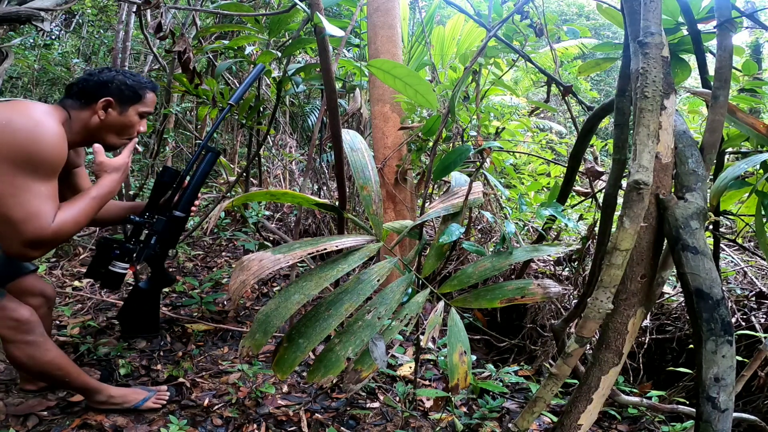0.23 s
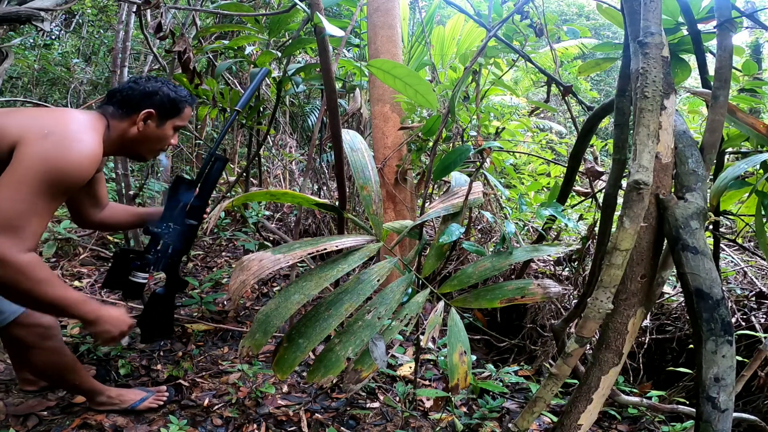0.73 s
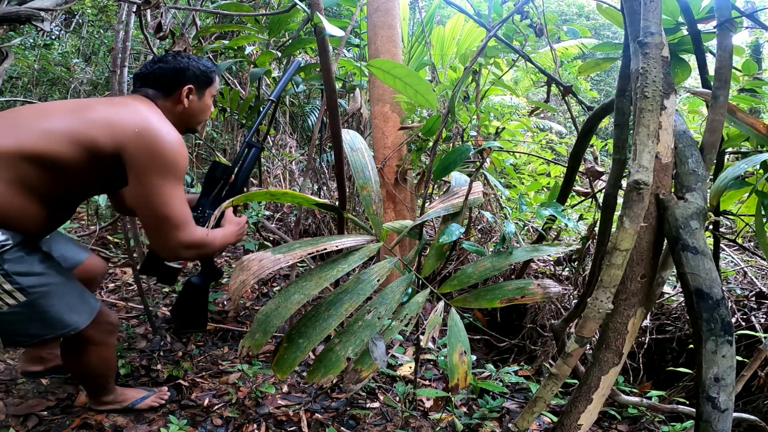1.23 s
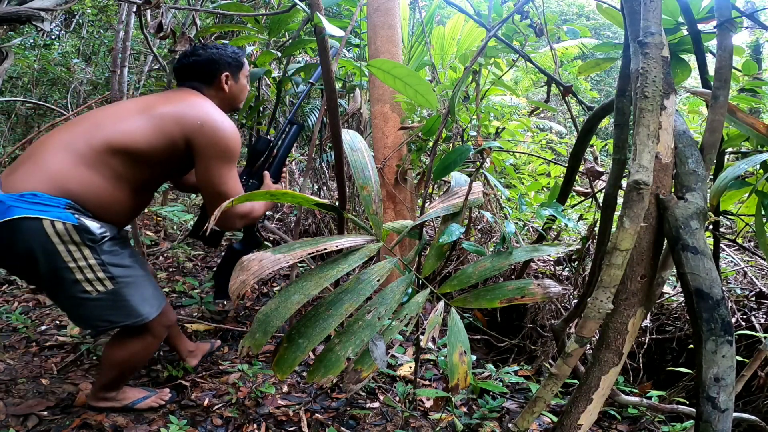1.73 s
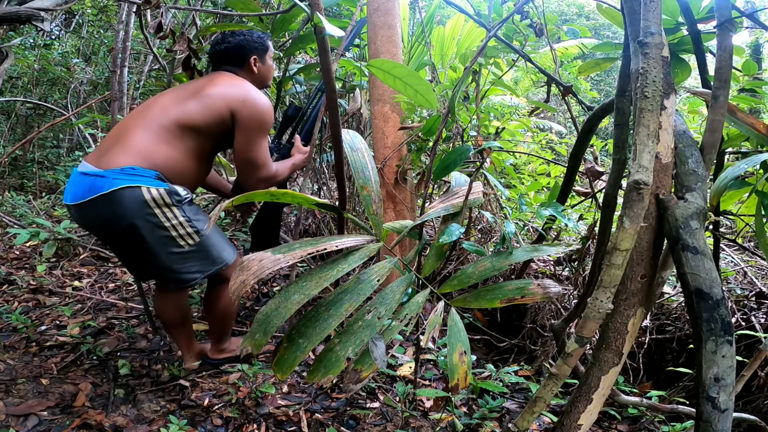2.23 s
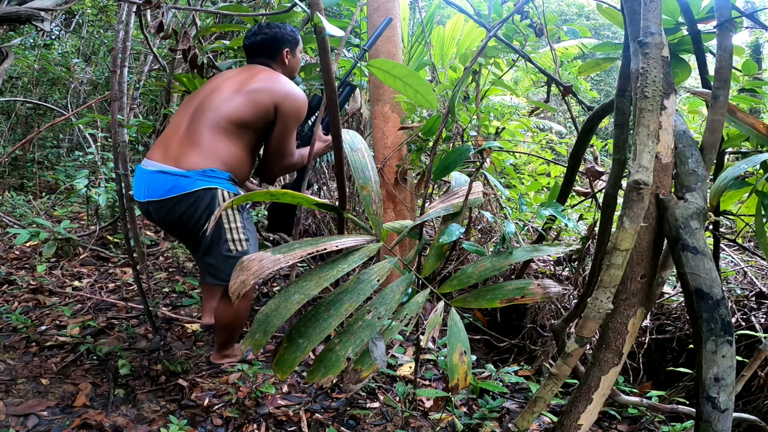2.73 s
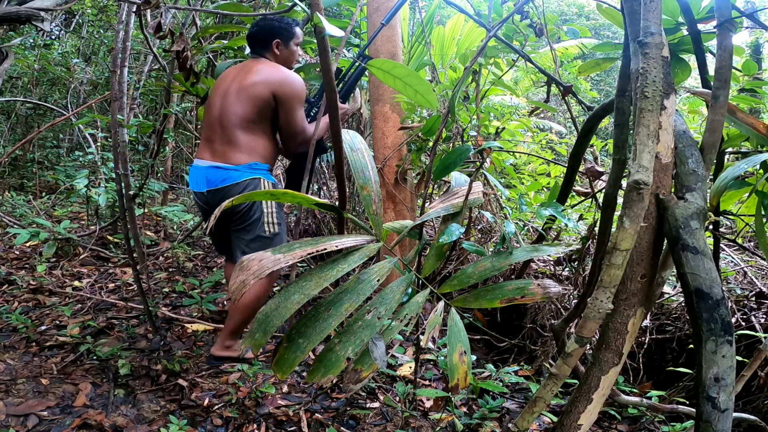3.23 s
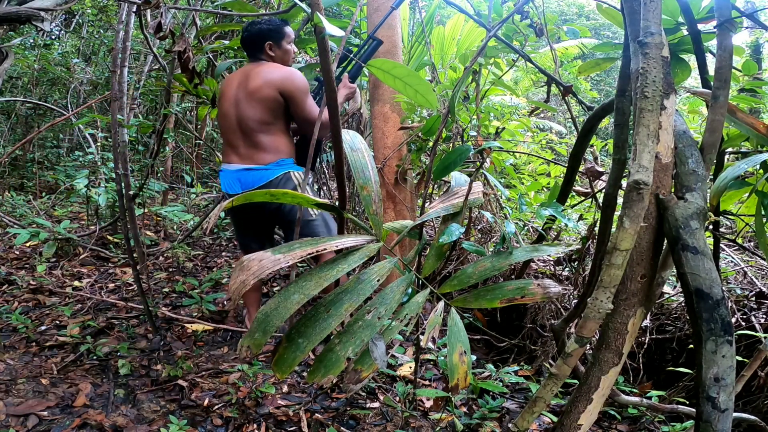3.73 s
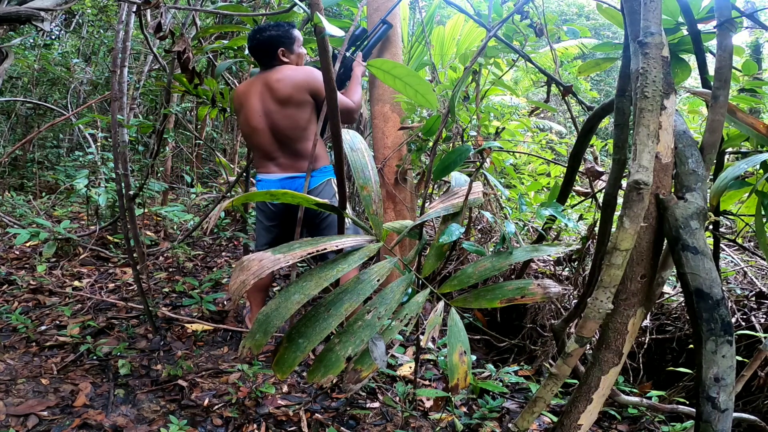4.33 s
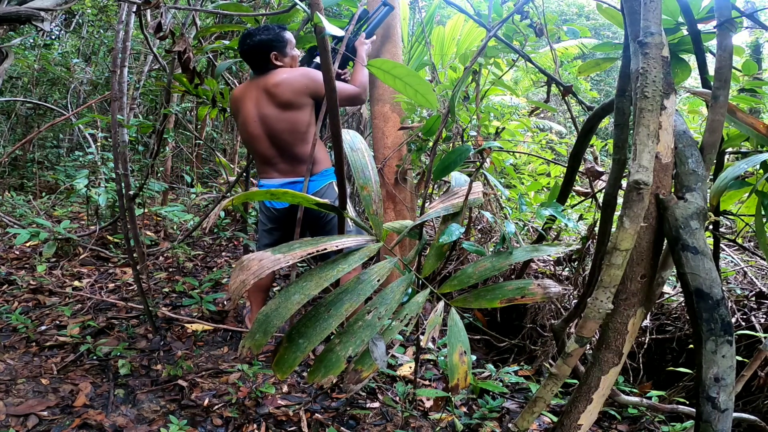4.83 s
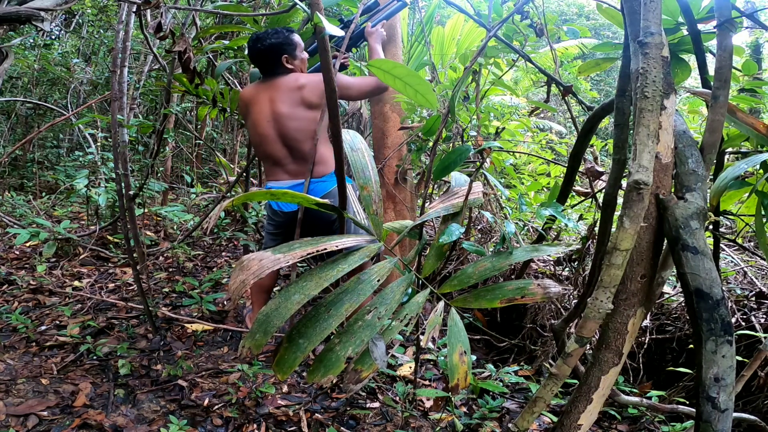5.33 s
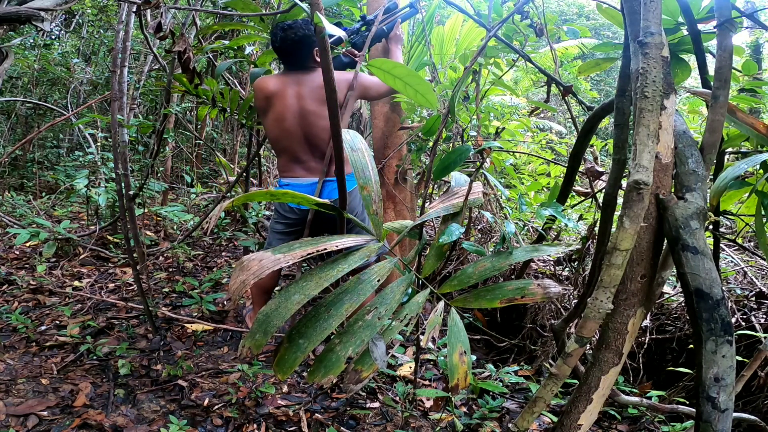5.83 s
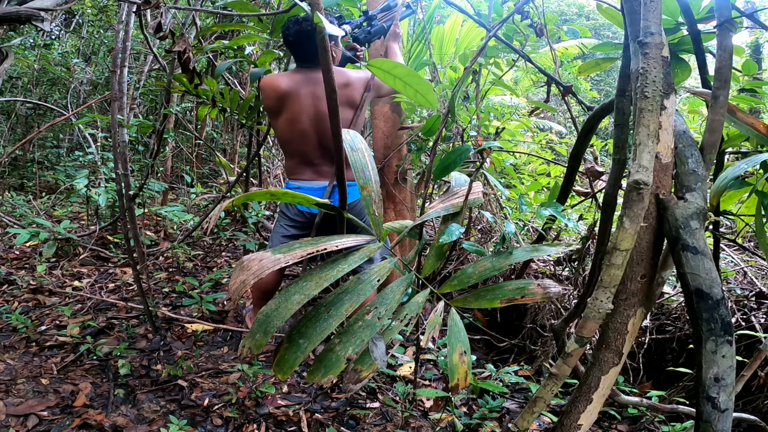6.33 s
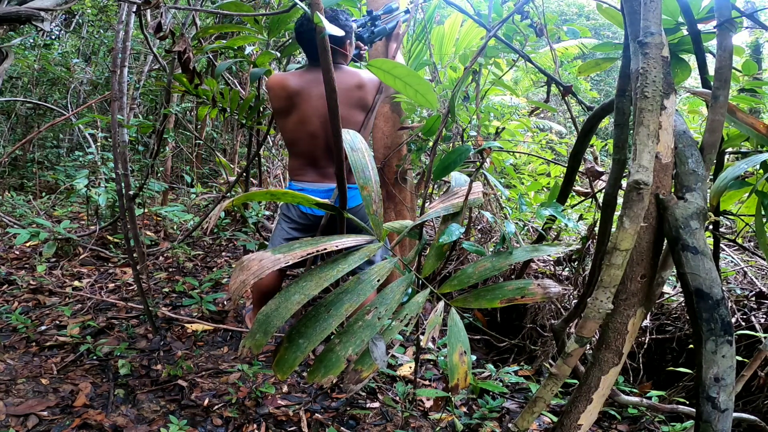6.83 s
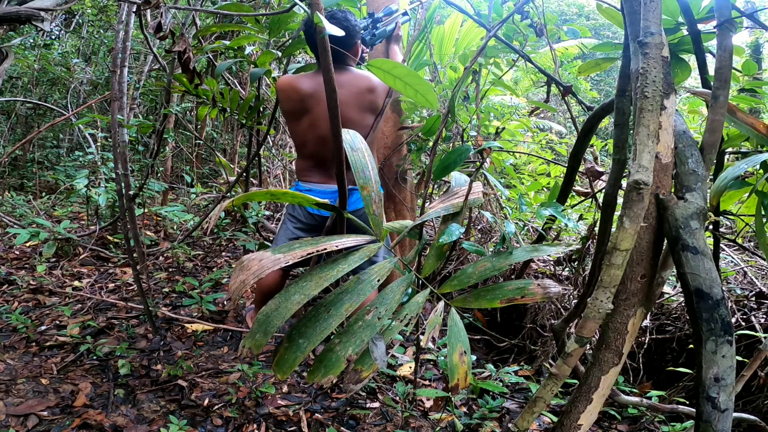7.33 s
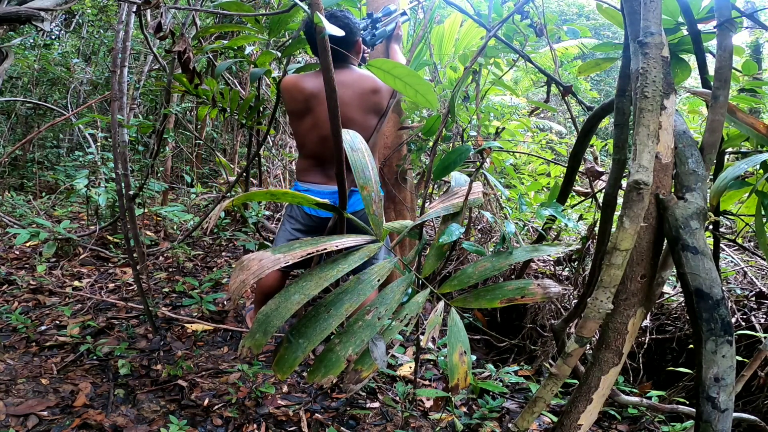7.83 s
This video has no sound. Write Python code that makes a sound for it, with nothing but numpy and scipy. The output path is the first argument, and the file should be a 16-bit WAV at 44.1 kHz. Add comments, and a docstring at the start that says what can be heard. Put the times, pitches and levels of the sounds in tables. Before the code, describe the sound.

Outdoor stereo forest scene with echoes among trunks. A dense buzzing cicada song around three kilohertz pulses about every one and a quarter seconds. Faint cricket tone, thin high insect whine and low breeze sit behind it. Nearby, stealthy footsteps press damp and dry leaves, stalks tick, and sticks crack, hardest just before four seconds. Regular bird whistles with chirps continue to the end as the footsteps grow sparse.

```python
"""Creeping through a tropical forest

Cicadas (tymbal-modulated partials) sing slow falling phrases over a far chorus, hiss and breeze (shaped noise).
Birds whistle, chirp and hoot, a cricket holds a high tone and an insect whines (gliding sines).
A man creeps over leaf litter: leaves crunch (random snaps), sticks crack and hollow wood knocks (ringing modes),
and dry stalks tick as he brushes past (filtered clicks). Decaying noise echoes place sounds among the trees.
"""
import sys
import numpy as np
from scipy import signal
from scipy.fft import rfft, irfft
from scipy.io import wavfile

SR = 44100
rng = np.random.default_rng(int(sys.argv[2]) if len(sys.argv) > 2 else 0)


def waveform_to_disk(signal):
    """Save audio, clipped to [-1, 1], as 16-bit WAV at the path in sys.argv[1]."""
    frames = np.transpose(np.atleast_2d(signal))
    scaled = np.clip(frames, -1, 1) * 32767
    samples = np.round(scaled).astype(np.int16)
    wavfile.write(sys.argv[1], SR, samples)


N = 357210
TIME = np.arange(N) / SR
FREQS = np.maximum(np.arange(N // 2 + 1) * SR / N, 1)


def from_db(db):
    """Decibels to amplitude gain."""
    return 10 ** (np.asarray(db) / 20)


def rms_one(x):
    """Scale to unit rms."""
    return x / np.sqrt(np.mean(x ** 2) + 1e-20)


def in_time(rows, t):
    """Interpolate each column of a curve at times t."""
    s, *columns = np.transpose(rows)
    return [np.interp(t, s, c) for c in columns]


def at_hz(points):
    """Interpolate a spectrum over log frequency."""
    hz, value = np.transpose(points)
    return np.interp(np.log(FREQS), np.log(hz), value)


def drift(rate_hz, size=N):
    """Unit-rms lowpassed noise, computed at SR / 40 and interpolated."""
    knots = rng.standard_normal(size // 40 + 2002)
    pole = np.exp(-80 * np.pi * rate_hz / SR)
    # the first 2000 knots let the filter settle
    slow = signal.lfilter([1], [1, -2 * pole, pole ** 2], knots)[2000:]
    return np.interp(np.arange(size) / 40, np.arange(len(slow)), rms_one(slow))


def add(track, start_s, sound):
    """Mix a sound in at start_s, trimmed to the track."""
    at = int(round(start_s * SR))
    lo, hi = max(at, 0), min(at + sound.shape[-1], N)
    track[..., lo:hi] += sound[..., lo - at:hi - at]


def pan(left_db):
    """Channel gains for a left-over-right level difference."""
    return from_db(np.array([[.5], [-.5]]) * left_db)


def band(x, low_hz, high_hz, order):
    """Causal Butterworth band-pass."""
    edges_hz = [low_hz, min(high_hz, SR / 2 - 1)]
    return signal.sosfilt(signal.butter(order, edges_hz, "band", fs=SR, output="sos"), x)


def at_level(sound, db):
    """Scale a blow so that its first 15 ms have the given rms level."""
    onset = sound[:SR * 15 // 1000]
    return from_db(db) * sound / np.sqrt(np.mean(onset ** 2))


def ring(x, hz, t60_s):
    """Damped two-pole resonator: a unit click starts a sine of height 1."""
    r, w = from_db(-60 / (t60_s * SR)), 2 * np.pi * hz / SR
    return signal.lfilter([0, np.sin(w)], [1, -2 * r * np.cos(w), r * r], x)


# stereo coherence of diffuse noise: (frequency [Hz], left-right likeness [0-1])
STEREO_LIKENESS = [(50, 0.98), (95, 0.86), (150, 0.1), (400, 0.23), (1200, 0.55), (3000, 0.27),
                   (5500, 0.048), (6600, 0.72), (7500, 1), (10500, .98), (13000, 1)]


def coloured(pair, gain):
    """Turn two unrelated signals into a diffuse stereo field with the given spectral gain."""
    mid, side = rfft(pair) * gain
    alike = at_hz(STEREO_LIKENESS)
    mid = np.sqrt((1 + alike) / 2) * mid
    side = np.sqrt((1 - alike) / 2) * side
    return irfft(mid + side * [[1], [-1]], N)


def noise(gain):
    """Diffuse noise with the given amplitude per root Hz."""
    return coloured(rng.standard_normal((2, N)), gain * np.sqrt(SR / 2))


def forest(x, wet_db, likeness):
    """Trunks and leaves scatter a sound into an exponentially dying cloud of echoes."""
    t60_s = 0.96
    t = TIME[:SR]
    mid, side = rng.standard_normal((2, SR)) * from_db(-60 * t / t60_s)
    echoes = np.sqrt(1 + likeness) * mid + np.sqrt(1 - likeness) * side * [[1], [-1]]
    response = rms_one(echoes) / np.sqrt(SR)
    wet = signal.fftconvolve(np.atleast_2d(x), response, axes=1)[:, :N]
    return (x + from_db(wet_db) * wet) / np.sqrt(1 + from_db(wet_db) ** 2)


def calls(table, shape, waver_hz, flutter_db):
    """A nearly pure tone follows the same pitch glide and level shape on every call."""
    t, out = TIME[:int(shape[-1][0] * SR)], np.zeros(N)
    bend_hz, shape_db = in_time(shape, t)
    for start_s, db, base_hz in table:
        hz = base_hz + bend_hz + waver_hz * drift(59, len(t))
        phase = 2 * np.pi * np.cumsum(hz) / SR
        level_db = db + shape_db + flutter_db * drift(76, len(t))
        swell = from_db(level_db) * signal.windows.tukey(len(t), .1)
        add(out, start_s, np.sqrt(2) * swell * np.sin(phase))
    return out


# breeze, before trim and lumps: (time [s], level [dB])
BREEZE_LEVEL = [(0.0, -69.5), (0.54, -71.5), (1.49, -58.5), (2.75, -68), (2.77, -82), (2.84, -50),
                (2.98, -86), (3.02, -65.5), (5.37, -73), (6.43, -60), (6.45, -74), (6.68, -49.5),
                (6.75, -77), (6.88, -54.5), (7.2, -65.5), (7.49, -58), (7.76, -81), (8.1, -61)]
# breeze spectrum, normalised to unit rms in use: (frequency [Hz], relative level [dB])
BREEZE_SPECTRUM = [(20, -25), (45, -2), (65, 5.5), (95, -3), (150, -6), (400, -50)]
# still air, before trim and pan: (frequency [Hz], level [dB per Hz])
AIR_SPECTRUM = [(25, -90.5), (55, -103), (110, -92.5), (155, -74), (220, -84.5), (300, -93.5), (750, -106),
                (1200, -101.5), (1550, -103), (2250, -106.5), (4300, -106), (8000, -104), (10200, -116),
                (12800, -117), (14000, -140)]


def air(breeze_db=0.5, lumps_db=2.5, drone_db=0.5):
    """Steady noise gives a low far drone and soft hiss; level-swept low noise is the buffeting breeze."""
    gust_db, = in_time(BREEZE_LEVEL, TIME)
    level_db = gust_db + breeze_db + lumps_db * drift(15)
    breeze = from_db(level_db) * rms_one(noise(from_db(at_hz(BREEZE_SPECTRUM))))
    still = noise(from_db(at_hz(AIR_SPECTRUM) + drone_db)) * pan(-3.2)
    return breeze + still


# far chorus humps, before throb and pan: (centre [Hz], width [Hz], level [dB per Hz])
CHORUS_HUMPS = [(2958, 129, -75.5), (3082, 234, -77), (5780, 420, -90.5), (6290, 235, -90),
                (11670, 540, -102), (12070, 390, -100), (12260, 300, -104)]


def far_chorus(throb_db=1.5, left_db=4.0):
    """Countless far cicadas merge into humps of noise round their partials."""
    power = np.zeros(len(FREQS))
    for hz, width_hz, db in CHORUS_HUMPS:
        offset = (FREQS - hz) / width_hz
        power += from_db(db) ** 2 / (1 + 2 * offset ** 2) ** 2
    return noise(np.sqrt(power)) * from_db(throb_db * drift(12)) * pan(left_db)


def phrase_starts():
    """Start times of the cicada phrases, repeated at a steady pace."""
    first_s, every_s = -.5, 1.257
    return np.arange(first_s, N / SR, every_s)


# one phrase, before each singer's stretch and offsets: (time [s], pitch [Hz], level [dB])
CICADA_PHRASE = [(0, 3055, -9), (.12, 3034, -2), (.42, 2999, 0), (.62, 2982, 0), (.72, 2975, -10)]
# singers: (pitch offset [Hz], lateness [s], length [x phrase], level [dB], brightness [dB per overtone],
# left over right [dB], left carrier lag [ms])
CICADA_SINGERS = [(0, 0, 1, -1, 1, -1, 0.0041), (-22, .0, .95, -2.5, 1.5, 0.5, 0.09),
                  (14, -.03, 1, -10.5, 1.5, 9, 0.072), (-120, .42, 1.35, -4, 0.5, 2, 0.0044),
                  (-100, .55, 1.2, -2.5, -1.5, 1, 0.11), (-165, 1, 1.05, -18, 3, -8, 0.091)]
# abdomen partials, before singer brightness: (multiple of pitch, level [dB])
PARTIALS = [(1, -54), (2, -60), (3, -79.5), (4, -68)]
# low-partial loudness; only the swing about its mean is used: (time [s], level [dB])
CICADA_SWING = [(0.0, -52), (0.63, -53), (1.17, -50.5), (1.44, -53), (2.48, -49), (2.77, -52.5),
                (3.83, -50.5), (3.95, -54.5), (4.17, -52), (4.92, -50.5), (5.37, -51), (6.14, -50),
                (6.63, -50), (7.53, -51), (7.74, -49), (8.1, -53)]
# pitches favoured by echoes off the trunks: (frequency [Hz], gain [dB])
TRUNK_GAIN = [(2820, -5), (2870, -1), (2900, -1), (2923, 4), (2957, -5), (2993, 4), (3014, -2), (3032, 1.5),
              (3065, -3), (3200, 0)]


def cicadas(waver_hz=2.896, flutter_db=2.5, tymbal_hz=136.1):
    """Tymbals drive tuned abdomens; pitch sags through each phrase and lower singers answer higher ones."""
    rasp_hz, throb = 7.0, .32
    low, high = np.zeros((2, 2, N))
    for offset_hz, late_s, stretch, singer_db, bright_db, left_db, lag_ms in CICADA_SINGERS:
        t = TIME[:int(CICADA_PHRASE[-1][0] * stretch * SR)]
        pitch_hz, level_db = in_time(CICADA_PHRASE, t / stretch)
        fade = signal.windows.tukey(len(t), .1)
        for start_s in phrase_starts():
            hz = pitch_hz + offset_hz + waver_hz * drift(6.2, len(t)) + rasp_hz * drift(184.0, len(t))
            lag_s = np.array([[lag_ms], [0]]) / 1000
            phase = 2 * np.pi * (np.cumsum(hz) / SR - hz * lag_s)
            stroke_hz = tymbal_hz * (1 + 0.0526 * drift(5.4, len(t)))
            strokes = np.sin(2 * np.pi * np.cumsum(stroke_hz) / SR)
            swell_db = level_db + singer_db + flutter_db * drift(43, len(t))
            swell = np.sqrt(2) * fade * from_db(swell_db)
            for k, (multiple, partial_db) in enumerate(PARTIALS):
                # tymbal strokes throb deepest in the overtones
                throbbing = 1 + throb * np.sqrt(multiple) * strokes
                partial = swell * throbbing * np.sin(multiple * phase)
                gain = from_db(partial_db + k * bright_db) * pan(left_db)
                add(low if k < 2 else high, start_s + late_s, gain * partial)
    swing_db, = in_time(CICADA_SWING, TIME)
    swing_db = swing_db - swing_db.mean()
    # high partials echo slightly less
    low = forest(low, wet_db=-2.0, likeness=.1)
    high = forest(high, wet_db=-3.0, likeness=.5)
    # the song swells as it glides through favoured pitches
    low = irfft(rfft(low) * from_db(at_hz(TRUNK_GAIN)), N)
    return low * from_db(swing_db) * pan(0.92) + high


# hoots, before shape and echoes: (time [s], level [dB], reference pitch [Hz])
HOOT_CALLS = [(-.11, -65.5, 1300), (.25, -54, 1283), (.605, -54, 1310), (.96, -54, 1287)]
# hooked hoot: (time [s], pitch offset [Hz], relative level [dB])
HOOT_SHAPE = [(0, -130, 1), (.025, -72.5, -4), (0.076, -52, -8), (.087, 186, -11), (.097, 130, 0.5),
              (.112, 14, -2), (.135, -12, 1), (.16, -9, -27)]


def hooting_bird():
    """A lower bird's sine tone hooks up and back in each hoot."""
    return forest(calls(HOOT_CALLS, HOOT_SHAPE, waver_hz=7, flutter_db=1.0), wet_db=0.0, likeness=.5)


# cricket, before shape and echoes: (time [s], level [dB], reference pitch [Hz])
CRICKET_CALLS = [(0.0, -71, 4450), (3.98, -73.5, 4494)]
# cricket tone: (time [s], pitch offset [Hz], relative level [dB])
CRICKET_SHAPE = [(0, 0, -2), (.3, 0, 0), (.62, -10, -1)]


def cricket():
    """A high, nearly steady sine with slight pitch and level flutter."""
    return forest(calls(CRICKET_CALLS, CRICKET_SHAPE, waver_hz=14, flutter_db=1.0), wet_db=-3.0, likeness=.5)


# whine: (time [s], offset from top pitch [Hz], relative level [dB])
WHINE_SHAPE = [(0, -330, -5), (.3, -100, 0), (.6, 0, 0), (.7, 0, -8)]


def whining_insect():
    """A thin sine slides upward once per cicada phrase."""
    after_s, level_db, top_hz = .67, -74, 12500
    whines = [(start_s + after_s, level_db, top_hz) for start_s in phrase_starts()]
    return forest(calls(whines, WHINE_SHAPE, waver_hz=45, flutter_db=2.5), wet_db=2.0, likeness=.6)


def crumple(colour, level_band_hz, per_s, spread_db, clump_db, count=9):
    """Leaves break in clumps of snaps, each ringing in its flake-size band; scaled by gain in level_band_hz."""
    edges_hz = np.geomspace(250, 15000, count + 1)
    clumps = from_db(clump_db * drift(19))
    snaps = np.zeros((2, N))
    for low_hz, high_hz in zip(edges_hz, edges_hz[1:]):
        at = rng.integers(0, N, (2, 20000))
        size_db = spread_db * np.minimum(rng.exponential(1, at.shape), 3.5)
        sizes = from_db(size_db) * rng.choice([-1, 1], at.shape)
        breaks = rng.random(at.shape) < per_s * (N / SR) / at.shape[1]
        train = np.array([np.bincount(a, w, N) for a, w in zip(at, sizes * breaks)])
        snaps += band(rms_one(train * clumps) + 1e-18, low_hz, high_hz, order=2)
    gain = from_db(at_hz(colour))
    in_band = (FREQS > level_band_hz[0]) & (FREQS < level_band_hz[1])
    return coloured(snaps, gain / np.sqrt(np.mean(gain ** 2 * in_band)))


def press(start_s, length_s):
    """The foot presses down, holds while it moves, then the leaves settle."""
    attack_s, t60_s = 0.022, 0.24
    t = TIME - start_s
    return np.clip(t / attack_s, 0, 1) * from_db(-60 * np.clip((t - length_s) / t60_s, 0, 2))


# steps and brushes, before trims: (time [s], length [s], crunch level [dB], rustle level [dB])
LITTER_STEPS = [(0.2, .06, -60.5, -65), (1.051, 0.29, -72, -77), (1.498, 0.29, -65, -65),
                (1.77, .12, -65, -62.5), (1.945, 0.078, -60.5, -60), (2.09, 0.11, -67.5, -69),
                (2.228, .1, -68, -61.5), (2.369, .13, -56.5, -64.5), (2.561, 0.14, -61, -67),
                (3.126, .15, -68, -67.5), (3.353, 0.063, -60, -66.5), (3.665, 0.17, -56, -56),
                (3.834, .13, -49, -59.5), (4.971, 0.03, -61.5, -63), (5.295, 0.079, -74, -69),
                (5.991, 0.15, -62, -69.5), (6.95, 0.18, -71.5, -76)]
# damp layer spectrum: (frequency [Hz], relative level [dB])
CRUNCH_SPECTRUM = [(150, -3), (400, -7), (750, -11), (1200, -1), (1800, -1.5), (2600, -1), (4500, -7.5),
                   (7000, -13), (12000, -40)]
# dry leaf spectrum: (frequency [Hz], relative level [dB])
RUSTLE_SPECTRUM = [(1200, -13), (2500, -1.5), (4500, 6), (8000, -1.5), (10500, -14), (13000, -17),
                   (15000, -35)]


def litter(crunch_db=0.0, rustle_db=-1.5):
    """The foot's weight crunches the damp layer while dry leaves on top rustle."""
    power = np.zeros((2, N))
    for start_s, length_s, low_db, high_db in LITTER_STEPS:
        power += (press(start_s, length_s) * from_db([[low_db], [high_db]])) ** 2
    weight, brush = np.sqrt(power)
    crunch = crumple(CRUNCH_SPECTRUM, (550, 1600), per_s=500, spread_db=4.0, clump_db=2.8)
    rustle = crumple(RUSTLE_SPECTRUM, (6800, 8400), per_s=900, spread_db=4.0, clump_db=2.8)
    return weight * from_db(crunch_db) * crunch + brush * from_db(rustle_db) * rustle


# stick cracks, onset rms before echoes: (time [s], wood [dB], thump [dB], splinters [dB])
STICK_CRACKS = [(0.2106, -36, -43.5, -44), (3.2159, -47.5, -51.5, -68), (3.7757, -42.5, -77, -61),
                (3.887, -42, -81, -50), (3.9395, -26.0, -34.5, -39.5), (4.0894, -54.5, -91, -82),
                (4.1462, -55.5, -91, -58), (4.234, -51, -59, -79)]
# stick modes: (frequency [Hz], relative level [dB], T60 [s])
STICK_MODES = [(746, -9.5, 0.0052), (1087, -18.5, 0.022), (1700, -6.5, 0.0044), (1760, -40, 0.016),
               (2270, -17.5, 0.03), (2490, -4.5, 0.0031), (3580, -48, 0.00067)]


def cracks(fibre_db=-19.0, fibre_t60_s=0.024, spray_db=-12.0, spray_t60_s=0.047,
           thump_hz=242.0, thump_t60_s=0.02):
    """A sharp release and tearing fibres ring the stick's modes; splinters spray and the ground thumps."""
    t, out = TIME[:SR // 8], np.zeros(N)
    release = 1.0 * (t == 0)
    snap = 14 * band(release, 1100, 3300, order=2)
    for start_s, wood_db, thump_db, splinter_db in STICK_CRACKS:
        tearing, spray = rng.standard_normal((2, len(t)))
        force = release + from_db(fibre_db - 60 * t / fibre_t60_s) * tearing
        wood = snap.copy()
        for k, (hz, db, t60_s) in enumerate(STICK_MODES):
            wood += (-1) ** k * from_db(db) * ring(force, hz, t60_s)
        wood = band(wood, 180, 14000, order=1)
        ground = release + from_db(-38) * ring(release, thump_hz, thump_t60_s)
        thump = band(ground, 170, 750, order=2)
        tears = release + from_db(spray_db - 60 * t / spray_t60_s) * spray
        splinters = band(tears, 3600, 7800, order=2)
        crack = at_level(wood, wood_db) + at_level(thump, thump_db) + at_level(splinters, splinter_db)
        add(out, start_s, crack)
    return forest(out, wet_db=-21.0, likeness=.5)


# dry stalks, before trim and echoes: (time [s], peak level [dB])
STALK_TICKS = [(.42, -34), (.5398, -32), (.9998, -29), (1.008, -30.5), (1.4618, -35), (1.8362, -42),
               (2.358, -29.5), (2.4922, -33), (2.683, -34), (3.692, -30.5), (3.9943, -28), (4.4832, -34.5),
               (4.9247, -32), (4.9628, -29), (4.9896, -23.5), (5.4078, -32.5), (7.1185, -34)]


def ticks(tick_db=0.0, chatter_db=-22.0, chatter_t60_s=0.09):
    """Thin stalks give a broad band-passed click and a little decaying noise chatter."""
    tick_hz = 5800
    t, out = TIME[:SR // 16], np.zeros(N)
    for start_s, db in STALK_TICKS:
        force = from_db(chatter_db - 60 * t / chatter_t60_s) * rng.standard_normal(len(t))
        force[0] = 1
        bright = band(force, tick_hz * 0.42, tick_hz * 4.2, order=1)
        sound = band(bright, 270, 7600, order=2)
        add(out, start_s, from_db(db + tick_db) * sound / np.abs(sound).max())
    return forest(out, wet_db=-11.5, likeness=0.54)


# songs, before shapes and echoes: (time [s], whistle level [dB])
BIRD_SONGS = [(1.47, -57.5), (2.08, -54.5), (2.67, -55.5), (3.27, -54.5), (3.88, -55), (4.48, -55),
              (5.10, -55.5), (5.72, -55.5), (6.35, -54.5), (6.98, -55.5), (7.60, -56)]
# rising whistle: (time [s], offset from top pitch [Hz], relative level [dB])
WHISTLE_SHAPE = [(0, -330, -3), (.035, -205, -2), (.08, -75, -2), (.13, 10, 0), (.18, 0, -3),
                 (.22, -30, -14)]
# chirp, dipping then flicking up: (time [s], offset from lowest pitch [Hz], relative level [dB])
CHIRP_SHAPE = [(0, 620, -2), (.01, 300, -1), (.022, 30, -8), (.038, 0, -10), (.052, 330, 3),
               (.066, 660, -2)]


def whistling_bird():
    """Each song is a rising sine whistle, then a short chirp with less echo."""
    whistle_top_hz = 2510
    chirp_after_s, chirp_db, chirp_low_hz = .352, -4.0, 1755
    whistles = [(s, db, whistle_top_hz) for s, db in BIRD_SONGS]
    chirps = [(s + chirp_after_s, db + chirp_db, chirp_low_hz) for s, db in BIRD_SONGS]
    whistle = calls(whistles, WHISTLE_SHAPE, waver_hz=9.2, flutter_db=2.0)
    chirp = calls(chirps, CHIRP_SHAPE, waver_hz=12, flutter_db=2.5)
    return forest(whistle, wet_db=7.5, likeness=0.22) + forest(chirp, wet_db=3.0, likeness=.3)


# knocks on hollow wood: (time [s], force level before modes [dB])
WOOD_KNOCKS = [(6.0045, -35.5), (6.0135, -44)]
# hollow wood modes, before trim: (frequency [Hz], relative level [dB], T60 [s])
HOLLOW_MODES = [(606, -15, 0.11), (890, 0, 0.016), (1380, -6, 0.035), (1595, -12, 0.093), (2100, -8, 0.028)]


def knocks(trim_db=-2):
    """Contact impulses ring the damped modes of hollow wood."""
    force = np.zeros(N) + 1e-18
    for start_s, db in WOOD_KNOCKS:
        add(force, start_s, from_db([db]))
    out = np.zeros(N)
    for k, (hz, db, t60_s) in enumerate(HOLLOW_MODES):
        out += (-1) ** k * from_db(db + trim_db) * ring(force, hz, t60_s)
    return forest(out, wet_db=-10.0, likeness=0.56)


def scene():
    """Sum the air, the insects and birds, and the man's contacts."""
    backdrop = air() + far_chorus()
    animals = cicadas() + hooting_bird() + cricket() + whining_insect() + whistling_bird()
    man = litter() + cracks() + ticks() + knocks()
    return backdrop + animals + man


def record(dry):
    """Steep low-pass, 70 dB down from the cutoff upward."""
    cutoff_hz = 15800
    return signal.sosfilt(signal.cheby2(12, 70, cutoff_hz, fs=SR, output="sos"), dry)


dry = scene()
out = record(dry)
waveform_to_disk(out)
```